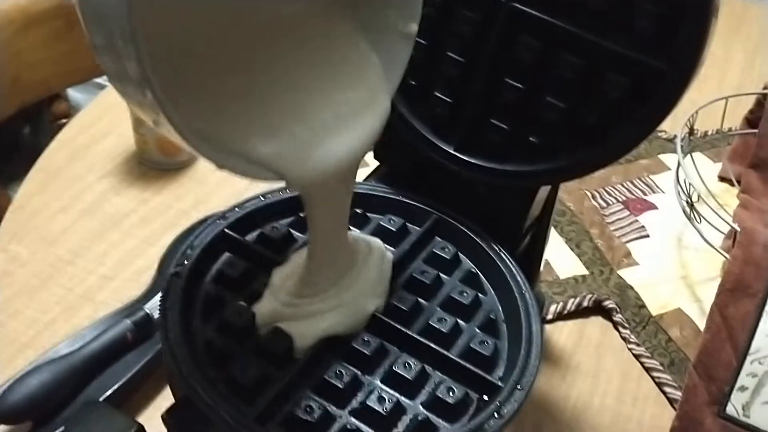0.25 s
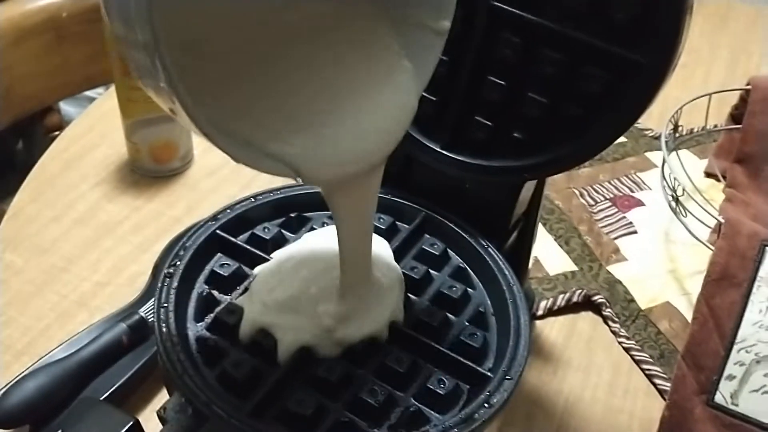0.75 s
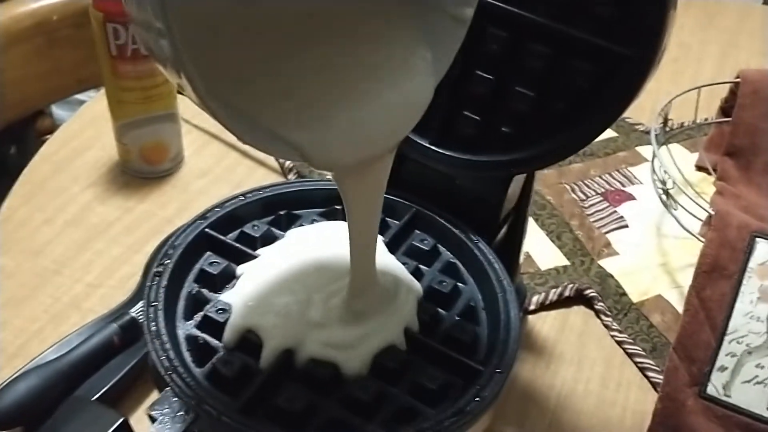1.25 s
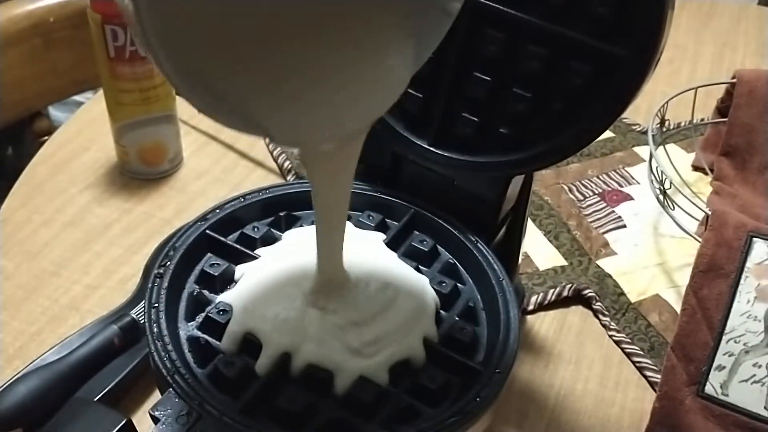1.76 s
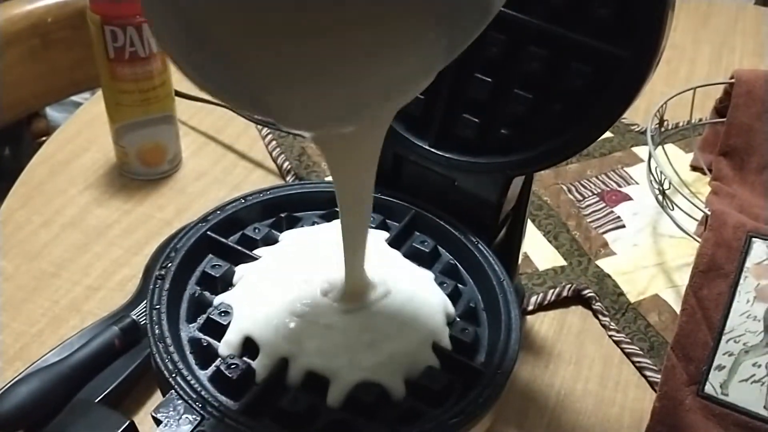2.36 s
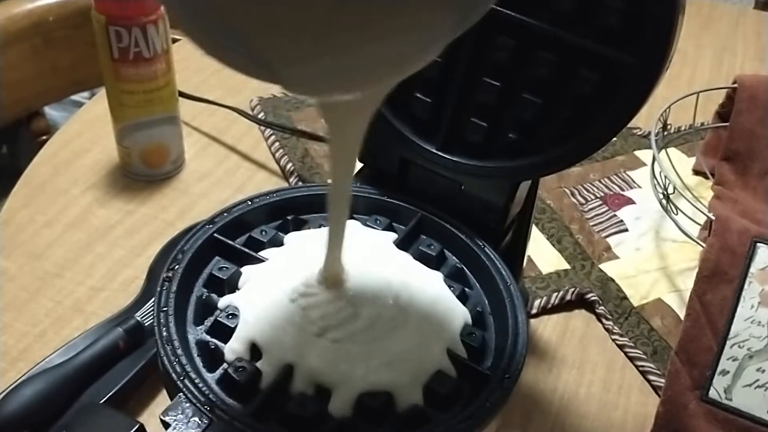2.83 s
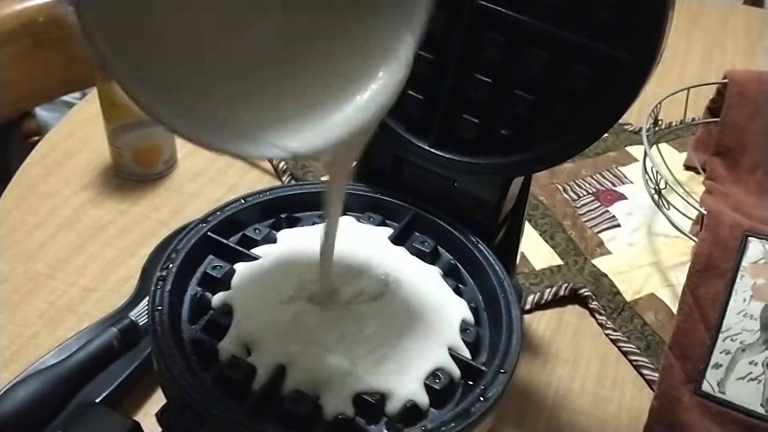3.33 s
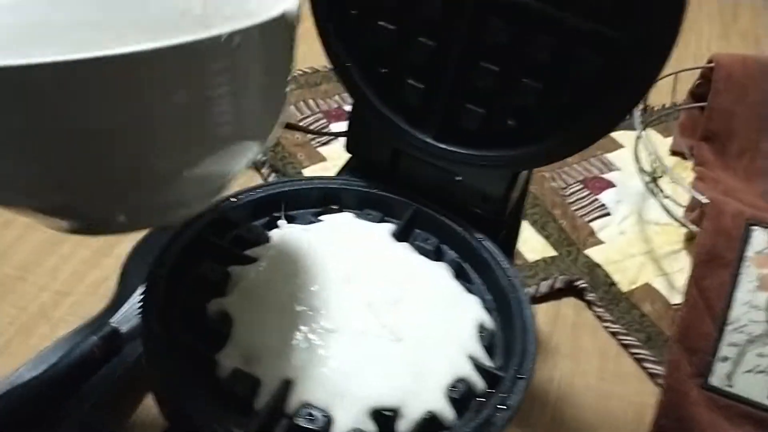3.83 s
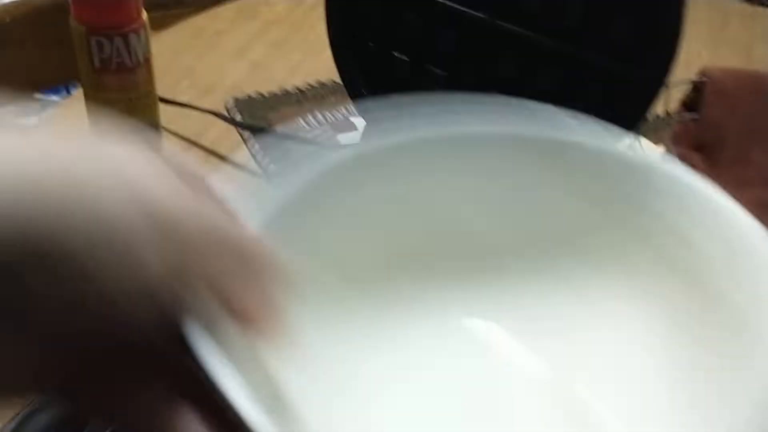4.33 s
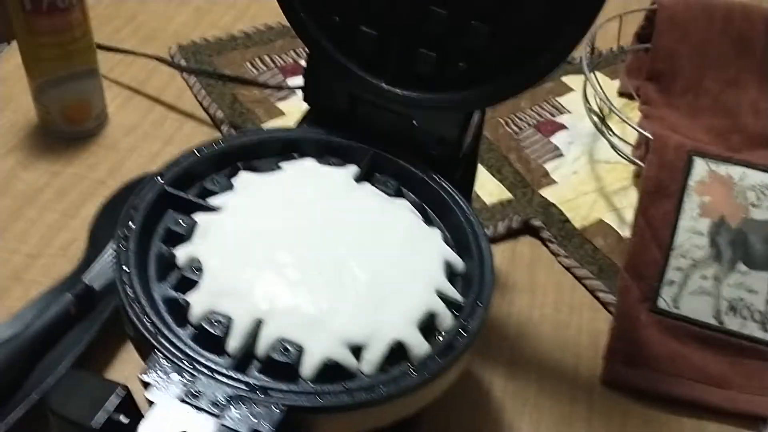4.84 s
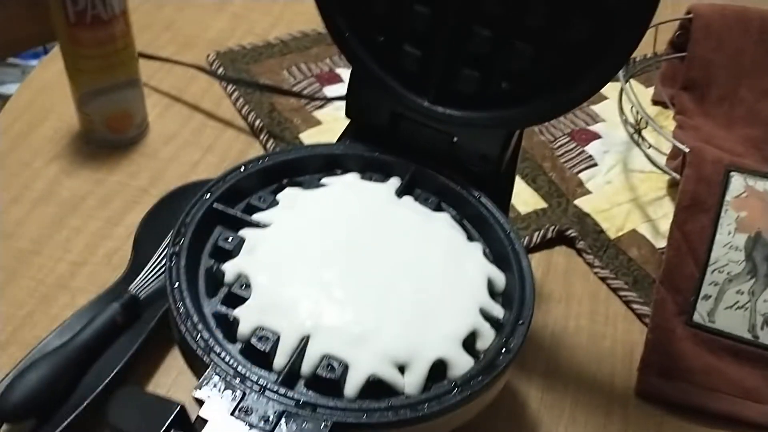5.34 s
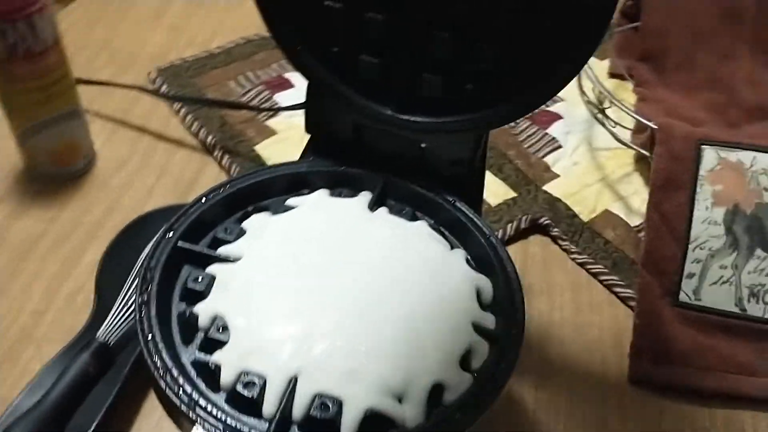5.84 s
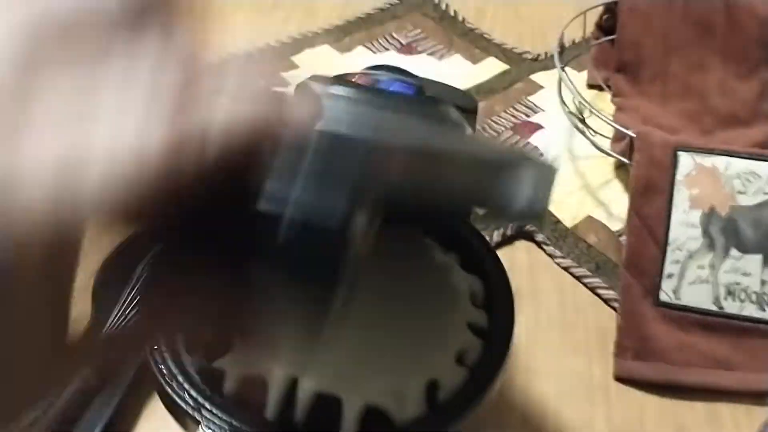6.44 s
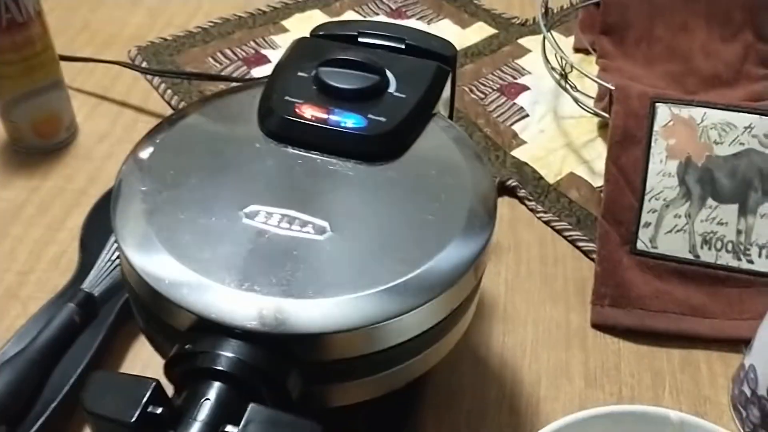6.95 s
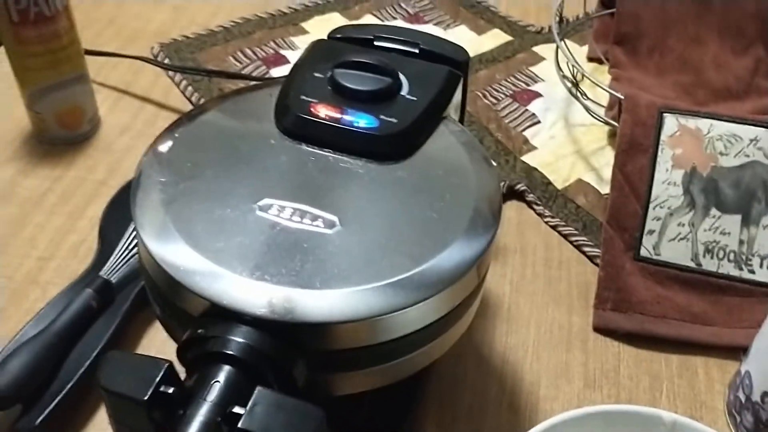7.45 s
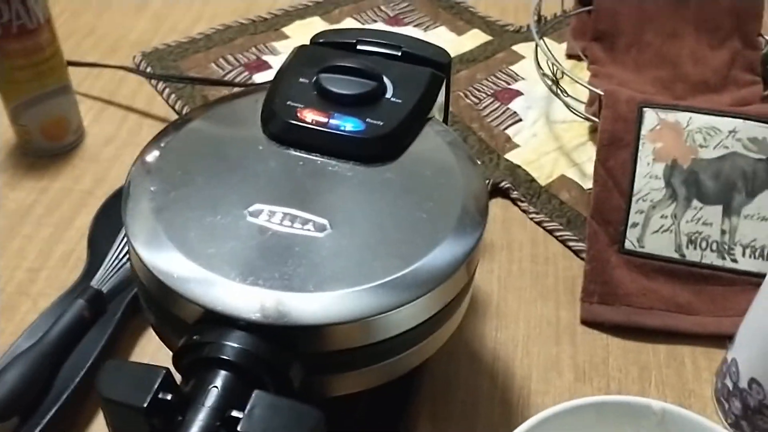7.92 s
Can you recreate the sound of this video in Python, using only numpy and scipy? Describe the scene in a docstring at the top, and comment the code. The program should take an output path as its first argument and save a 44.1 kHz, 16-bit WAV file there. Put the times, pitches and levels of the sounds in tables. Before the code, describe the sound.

Batter sizzles faintly on the hot plate of a waffle maker, half a metre from a stereo microphone and slightly to the right. The fine, high crackle grows over the first 3.7 seconds, dotted with tiny steam chirps and spits of fat, the sharpest near 2.8 seconds. At 4.3 seconds a bowl clinks once, close on the right, and the sizzle dips briefly. From about 5 to 5.2 seconds the bowl rocks onto a wooden table in three quick knocks. The sizzle carries on with a few more spits, and a hinge rubs very faintly at 6.2 seconds. The lid lands with a loud clunk near 6.9 seconds, then shuts at 7 with a louder clunk, a metal clack and two small rebounds. The muffled sizzle fades out by 8 seconds. A faint appliance hum runs underneath, and the kitchen's hard walls add a short echo.

```python
"""Batter sizzles on the hot plate of a waffle maker, half a metre from a stereo microphone in a kitchen.
Steam pockets chirp, films tear and fat spits, more and more as the poured batter covers the plate.
The bowl clinks once, close on the right, then rocks onto the wooden table in three knocks.
The lid comes down with a clunk, shuts with a metal clack and muffles the sizzle.
Behind it all an appliance hums, and the close, hard walls add a short tail."""
import sys
import numpy as np
from scipy import signal
from scipy.fft import rfft, irfft
from scipy.io import wavfile
from scipy.ndimage import uniform_filter1d

SR = 44100
rng = np.random.default_rng(int(sys.argv[2]) if len(sys.argv) > 2 else 0)


def to_wav(sig):
    """Store sig (one row per channel, or 1-D mono) as 16-bit WAV at the path in sys.argv[1].

    Samples outside -1..1 are clipped; the rate is SR.
    """
    pcm = np.clip(np.atleast_2d(sig), -1, 1) * 32767
    pcm = np.round(pcm).astype(np.int16)
    wavfile.write(sys.argv[1], SR, pcm.T)  # frames by channels


N = 360738
TIME = np.arange(N) / SR
RING_S = .6  # time allowed for a blow or the room to die away


def undb(db):
    """Decibels to gain."""
    return 10 ** (np.asarray(db) / 20)


def level(x, db):
    """Scale to an rms level."""
    return x * undb(db) / np.sqrt(np.mean(x ** 2))


def clock(seconds):
    """Sample times."""
    return np.arange(int(seconds * SR)) / SR


def fade(t, t60):
    """A decay that loses 60 dB in t60 seconds."""
    return np.exp(-np.log(1000) * t / t60)


def swell(centre_s, width_s):
    """A smooth rise to 1 and fall around a moment."""
    return np.exp(-((TIME - centre_s) / width_s) ** 2)


def waver(per_s):
    """Random levels joined smoothly, spread near 1."""
    size = int(SR / per_s)
    steps = np.repeat(rng.standard_normal(N // size + 1), size)
    return 1.2 * uniform_filter1d(steps, size)[:N]


def along(points, hz):
    """Read (frequency, value) points on a log-frequency axis."""
    f, value = np.transpose(points)
    return np.interp(np.log(hz + 1), np.log(f), value)


def add(out, s, sound):
    """Mix a sound in at a time."""
    i = int(s * SR)
    out[:, i:i + sound.shape[1]] += sound[:, :N - i]


def pan(left_db):
    """Gains at the two microphones; a negative difference places the source to the right."""
    return undb(np.array([[left_db], [-left_db]]) / 2)


def colour(x, points):
    """Minimum-phase filter with the given spectral shape; white noise keeps its level."""
    size = 4096
    shape_db = along(points, np.fft.rfftfreq(size, 1 / SR))
    cepstrum = irfft(shape_db * np.log(10) / 20)
    cepstrum[1:size // 2] *= 2
    cepstrum[size // 2 + 1:] = 0
    response = irfft(np.exp(rfft(cepstrum)))
    return signal.fftconvolve(x, response[None] / np.linalg.norm(response), axes=1)[:, :x.shape[1]]


def air(size, alike_hz):
    """White noise at the two microphones, alike in both below alike_hz."""
    mid, side = rfft(rng.standard_normal((2, size)))
    alike = 1 / (1 + (np.fft.rfftfreq(size, 1 / SR) / alike_hz) ** 2)
    mid, side = mid * np.sqrt((1 + alike) / 2), side * np.sqrt((1 - alike) / 2)
    return irfft([mid + side, mid - side], size)


def ring(modes, alike_hz):
    """Fading modes; the higher ones reach the two microphones out of step."""
    t, out = clock(RING_S), 0
    for k, (hz, db, t60) in enumerate(modes):
        skew = min(hz / alike_hz, 1) * (2 * rng.random() - 1) * np.array([[1], [-1]])
        out = out + (-1) ** k * undb(db) * np.sin(2 * np.pi * hz * t + skew) * fade(t, t60)
    return out


def burst(points, t60, alike_hz):
    """The crowd of short-lived modes that a blow wakes: coloured, fast-fading noise."""
    t = clock(RING_S)
    return colour(air(len(t), alike_hz) * fade(t, t60), points) / 2


def pops(per_s, spread_db):
    """Random impulses, mostly small and now and then large."""
    chance, size = rng.random(N), np.minimum(rng.exponential(size=N), 5)
    return (chance < per_s / SR) * undb(spread_db * size) * rng.choice([-1, 1], N)


def excite(x, response):
    """Every sample of x sets off the stereo response."""
    return signal.oaconvolve(np.atleast_2d(x), response, axes=1)[:, :N]


# the murmur of the kitchen, all around the microphones: (frequency [Hz], level [dB])
MURMUR_COLOUR = [(25, -27.5), (45, -11.5), (80, -6.5), (180, -1), (300, -4), (400, -9), (560, -5),
                 (830, -16), (890, -7.5), (950, -15), (1300, -17), (3000, -19.5), (7000, -23), (15000, -29)]
# an appliance in the room: (frequency [Hz], rms level [dB])
HUM_PARTIALS = [(59.5, -91), (119.5, -78.5), (161, -84.5), (238, -87.5), (296, -84.5)]
def room_tone():
    """An appliance hums over the barely wavering murmur of the room."""
    murmur = level(colour(air(N, alike_hz=679.4), MURMUR_COLOUR), db=-71)
    murmur *= undb(0.06 * waver(per_s=2))
    hum = sum(undb(db) * np.sqrt(2) * np.sin(2 * np.pi * (hz * TIME + rng.random()))
              for hz, db in HUM_PARTIALS)
    return murmur + hum


# the kitchen's decay, heard from the table: (frequency [Hz], t60 [s])
KITCHEN_DECAY = [(100, .31), (500, .3), (2000, .31), (6000, .26), (14000, .22)]
def kitchen(x, wet_db, gap_s=0.0045, lag_samples=8):
    """Direct sound reaches the left microphone first; hard walls add a tail whose treble dies soonest."""
    t = clock(RING_S)
    spectrum, hz = rfft(air(len(t), alike_hz=1010)), np.fft.rfftfreq(len(t), 1 / SR)
    tail = 0
    for centre, t60 in KITCHEN_DECAY:
        band = along([(f, f == centre) for f, _ in KITCHEN_DECAY], hz)
        tail = tail + irfft(spectrum * band, len(t)) * fade(t, t60)
    tail *= np.clip(t / gap_s - 1, 0, 1)  # the reflections fade in after the gap
    tail *= undb(wet_db) / np.linalg.norm(tail[0])
    direct = np.array([x[0], np.pad(x[1], (lag_samples, 0))[:N]])
    return direct + excite(x, tail)


# contacts within one touch of the bowl's rim: (time [s], level [dB])
RIM_CONTACTS = [(4.2803, -35), (4.2812, -22), (4.2826, -24)]
# the rim's ring: (frequency [Hz], level [dB], t60 [s])
RIM_MODES = [(3031, -25, .12), (4080, -18, .15), (5022, 1, .16), (5086, 0, .14), (5679, -1, .16),
             (6151, -5, .13), (6640, -7, .12), (7149, -12, .11), (8705, -16, .2)]
# the click of each contact: (frequency [Hz], level [dB])
RIM_COLOUR = [(500, -46), (2500, -25), (4200, -12.5), (5300, -8), (6300, -5.5), (7500, -20), (8700, -16.5),
              (11000, -25), (15000, -39)]
def bowl_clink():
    """The rim of the bowl is touched once and rings, close by and to the right."""
    out = np.zeros((2, N))
    rim = undb(-25) * ring(RIM_MODES, alike_hz=6000)
    for s, db in RIM_CONTACTS:
        add(out, s, undb(db) * (rim + burst(RIM_COLOUR, t60=.014, alike_hz=6000)))
    return out * pan(-8)


def board_push(length_s):
    """The first swing of a struck board: one cycle of pressure, alike at both microphones."""
    t = clock(length_s)
    return -np.sin(2 * np.pi * t / length_s) * np.sin(np.pi * t / length_s) * pan(0)


# the wooden table top: (frequency [Hz], level [dB], t60 [s])
WOOD_MODES = [(95, -17, .2), (135, -13, .18), (240, -9, .16), (274, -3, .2), (322, -4, .18), (349, -3, .17),
              (385, -6, .17), (412, -7, .16), (462, -6, .16), (537, -3, .16), (608, -3, .16), (658, 2, .16),
              (751, 0, .18), (790, -1, .14), (884, -1, .18), (1047, 0, .17), (1090, -3, .15),
              (1440, -11, .2), (1840, -12, .18), (2410, -17, .2)]
# the dull knock of the wood and the bright tick of the bowl: (frequency [Hz], level [dB])
WOOD_COLOUR = [(40, -23.5), (100, -5.5), (280, 0.5), (700, 0), (1080, -3), (1400, -9.5), (2200, -12),
               (3500, -28), (7000, -44), (15000, -52)]
BOWL_TICK_COLOUR = [(500, -3), (2000, -13.5), (4000, 3), (6500, 0), (9000, -7.5), (15000, -20)]
# the bowl's foot meets the table: (time [s], blow level [dB], tick level [dB], bass cutoff [Hz])
FOOT_KNOCKS = [(4.9562, -18, -27.5, 35), (5.0758, -18, -33.5, 60), (5.157, -17, -33.5, 200)]
def bowl_knocks():
    """The foot of the bowl rocks onto the table, which booms under it, straight ahead."""
    out = np.zeros((2, N))
    table = undb(-15) * ring(WOOD_MODES, alike_hz=1496)
    for s, db, tick_db, low_hz in FOOT_KNOCKS:
        knock = table + undb(2) * burst(WOOD_COLOUR, t60=0.11, alike_hz=1310)
        # each successive knock has less bass
        knock = signal.sosfilt(signal.butter(1, low_hz, "high", fs=SR, output="sos"), knock)
        tick = burst(BOWL_TICK_COLOUR, t60=.04, alike_hz=2980)
        add(out, s, undb(db) * knock + undb(tick_db) * tick)
        add(out, s, undb(db) * board_push(length_s=0.0019))
    return out


# the waffle maker's base, hollow housing and cast plates: (frequency [Hz], level [dB], t60 [s])
BASE_RING = [(72, -18, .25), (140, -6, .12), (163, -1, .15), (192, 2, .19), (212, -2, .16), (237, -4, .2)]
HOUSING_RING = [(273, 1, .22), (298, 2, .25), (322, 0, .22), (365, -8, .18), (409, -10, .18),
                (476, -8, .17), (535, 2, .2), (562, 1, .12), (690, 3, .13), (735, 5, .17), (1006, -8, .17),
                (1210, -9, .13), (1256, -9, .13), (1310, -10, .12), (1995, -13, .18), (2522, -13, .18)]
PLATE_RING = [(3440, -15, .14), (3730, -22, .6), (3919, -13, .14), (4592, -9, .12), (4877, -3, .15),
              (5566, 0, .13), (6153, -1, .13), (6210, -3, .13), (6405, -4, .15), (6562, -4, .12),
              (6856, -4, .12), (7173, 1, .15), (7338, 0, .12), (7994, -9, .14), (9700, -14, .15)]
# noise of a blow on the base, housing, plates and hard edge: (frequency [Hz], level [dB])
BASE_THUD = [(40, -27.5), (110, -11.5), (165, -1), (230, 0.5), (400, -8), (1500, -41.5)]
HOUSING_NOISE = [(40, -27), (100, -8.5), (280, -0.5), (450, -3.5), (680, -1), (900, -8.5), (1250, -11),
                 (1700, -15.5), (2500, -24), (5000, -29.5), (9000, -36), (15000, -47.5)]
PLATE_CLACK = [(800, -24), (2500, -12), (4000, -9.5), (5500, -2.5), (7300, 1), (8300, -9.5), (11000, -29),
               (15000, -37)]
EDGE_TICK = [(400, -13), (1250, 10.5), (1650, -4), (2100, 7), (3200, 2.5), (6000, 0), (9000, -6.5),
             (15000, -24)]
# the lid brushes, lands, tips, drops, seats and rebounds twice:
# (time [s], level [dB], weight on the base [dB], hardness [dB])
LID_CONTACTS = [(6.855, -39, -15, -27), (6.8756, -15.5, -8.5, -4), (6.989, -18.5, -15.5, -8),
                (6.9934, -10.5, -21.5, -22.5), (7.0317, -10.5, -2.5, 2.5), (7.074, -28.5, -6, -9.5),
                (7.144, -34, -5, -28)]
def lid():
    """Just left of centre, blows shake the housing; heavy ones thud the base, hard ones ring the plates."""
    out = np.zeros((2, N))
    base = undb(-10.5) * ring(BASE_RING, alike_hz=2000)
    housing = undb(-16) * ring(HOUSING_RING, alike_hz=2497)
    plates = undb(-26.5) * ring(PLATE_RING, alike_hz=9000)
    clack = lambda: plates + burst(PLATE_CLACK, t60=0.034, alike_hz=6986)
    tick = lambda: burst(EDGE_TICK, t60=0.036, alike_hz=4967)
    for s, db, weight_db, hard_db in LID_CONTACTS:
        thud = base + undb(-4.5) * burst(BASE_THUD, t60=.1, alike_hz=1990)
        clunk = housing + burst(HOUSING_NOISE, t60=0.094, alike_hz=2000)
        edge = tick() + undb(-15) * clack()
        add(out, s, undb(db) * (clunk + undb(weight_db) * thud + undb(hard_db) * edge))
    # just before the lid seats, the two plates clack together and chatter, weaker each time
    clack_s, gap_s = 7.0075, .003
    for k, db in enumerate([-6, -10, -14]):
        add(out, clack_s + k * gap_s, undb(db) * (clack() + undb(-11.5) * tick()))
    return out * pan(1.0)


def hinge():
    """As the lid starts to move, its hinge rubs faintly through the housing."""
    rub = level(colour(air(N, alike_hz=1996), HOUSING_NOISE), db=-70)
    return rub * swell(centre_s=6.17, width_s=0.083)


POUR_START_S, POUR_END_S = -0.024, 3.73
def coverage():
    """The batter runs at a steady rate, so the covered share of the plate grows evenly."""
    return np.clip((TIME - POUR_START_S) / (POUR_END_S - POUR_START_S), 0, 1)


def frying_db():
    """A crust calms the frying, the bowl passes before the microphones, the lid shuts, batter seals it."""
    crust_db_per_s, shade_db, muffle_db, seal_db_per_s = -0.6, -4.5, -10.5, -12
    shut_s, swing_s = 7.106, .45
    crust = crust_db_per_s * np.maximum(TIME - POUR_END_S, 0)
    shade = shade_db * swell(centre_s=4.53, width_s=0.21)
    muffle = muffle_db * np.clip(1 + (TIME - shut_s) / swing_s, 0, 1)
    seal = seal_db_per_s * np.maximum(TIME - shut_s, 0)
    return crust + shade + muffle + seal


def chirp(start_hz, length_s, fall_ratio=.55):
    """A steam pocket bursts: a blip of a few ms whose pitch falls."""
    age = clock(length_s) / length_s
    phase = 2 * np.pi * np.cumsum(start_hz * fall_ratio ** age) / SR
    skew = rng.uniform(-.9, .9) * np.array([[1], [-1]])
    return np.sin(phase + skew) * np.sin(np.pi * np.sqrt(age)) ** 2


def small_spits():
    """Droplets of fat snap at random, more strongly as the batter spreads."""
    snaps = pops(per_s=9.8, spread_db=1.5) * coverage() * undb(-49 + frying_db())
    return excite(snaps, burst(FRYING_CRACKLE, t60=0.012, alike_hz=6000)) * pan(-2)


# the loudest spits of fat and steam off the plate: (time [s], level [dB], relative treble [dB])
LOUD_SPITS = [(0.738, -52, -30), (0.839, -46, -37), (1.7534, -44, -27), (2.5303, -42, -10.5),
              (2.806, -35.5, -22), (3.3243, -43.5, -13), (3.5918, -46, -14), (3.62, -54, -20),
              (5.3867, -44, -10), (5.97, -40, -10.5), (6.028, -44, -13)]
def loud_spits(chirp_db=-1, snap_db=16):
    """A larger pocket snaps open and chirps; the sharper the snap, the less it chirps."""
    out = np.zeros((2, N))
    for s, db, treble_db in LOUD_SPITS:
        sharpness = undb(treble_db + snap_db)
        chirp_gain = undb(db + chirp_db) * (1 - min(sharpness, 1) / 2)
        add(out, s, chirp_gain * chirp(start_hz=7600, length_s=.005))
        add(out, s, undb(db) * sharpness * burst(FRYING_CRACKLE, t60=0.011, alike_hz=6000))
    return out * pan(-2.4)


# bubbles, tearing films and the grid's open wells, half a metre off: (frequency [Hz], level [dB])
FRYING_BUBBLES = [(1500, -25), (3100, -12.5), (4000, -4), (5800, 1), (7000, 0), (8300, -4.5),
                  (11000, -16.5)]
FRYING_CRACKLE = [(600, -19), (1500, -16), (2800, -7.5), (4500, 2.5), (8300, -0.5), (11500, 0),
                  (15500, -3.5)]
GRID_WELLS = [(1500, -24.5), (1790, -19), (1890, -1), (2010, -17.5), (2500, -9), (3200, -10.5), (3600, -3),
              (3950, 2.5), (4450, -8.5), (7000, -20.5)]
def sizzle(surge_db=1.26):
    """A little to the right, chirping bubbles and a fine crackle grow as the batter covers the plate."""
    covered, age = coverage(), clock(.0025)
    bubbles, crackle = 0, 0
    for hz in np.geomspace(5500, 9500, num=10):
        blip = chirp(hz, length_s=rng.uniform(.003, .007))
        bubbles = bubbles + excite(pops(per_s=94, spread_db=2.5), blip)
        # films tear all across the plate, each scattered for a moment by the grid
        tear = air(len(age), alike_hz=4500) * np.exp(-age / .0003)
        crackle = crackle + excite(pops(per_s=130, spread_db=3.0), tear)
    # the wells ring with the frying, less as batter fills them
    wells = level(colour(crackle, GRID_WELLS), db=-72.5) * undb(-9 * covered)
    bubbles = level(colour(bubbles, FRYING_BUBBLES), db=-65) * covered ** 0.41
    crackle = level(colour(crackle, FRYING_CRACKLE), db=-62) * covered ** 1.52
    surges = surge_db * waver(per_s=4.8)
    return (bubbles + crackle + wells) * undb(frying_db() + surges) * pan(-2.4)


def scene():
    """Everything happens on one kitchen table, about half a metre from the microphones."""
    frying = kitchen(sizzle() + loud_spits() + small_spits(), wet_db=-5)
    bowl = kitchen(bowl_clink(), wet_db=-7.5) + kitchen(bowl_knocks(), wet_db=-2.0)
    closing = kitchen(lid() + hinge(), wet_db=-7)
    return frying + bowl + closing + room_tone()


def record(dry, top_hz=15900):
    """The phone that holds the microphones cuts the top treble steeply."""
    return signal.sosfilt(signal.ellip(10, .2, 70, top_hz, fs=SR, output="sos"), dry)


dry = scene()
out = record(dry)
to_wav(out)
```